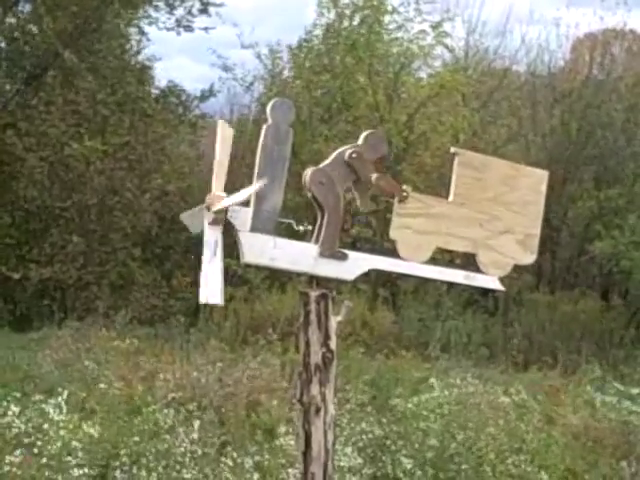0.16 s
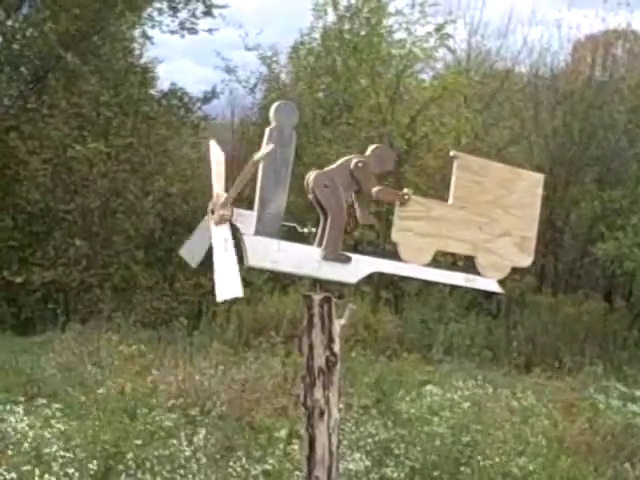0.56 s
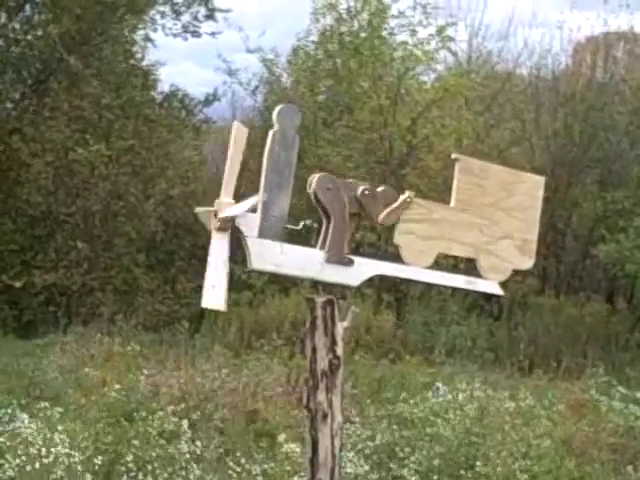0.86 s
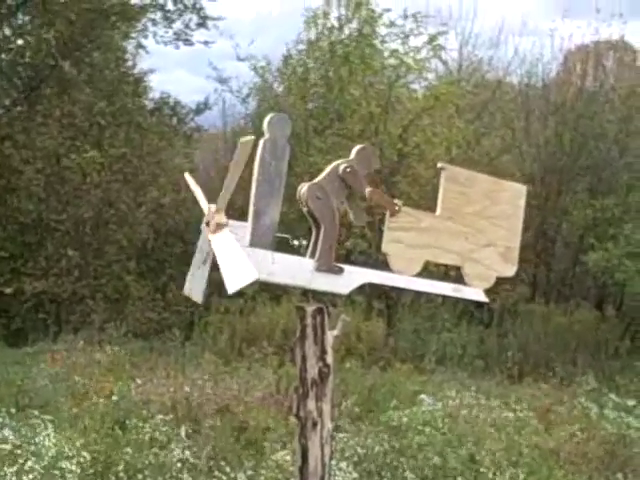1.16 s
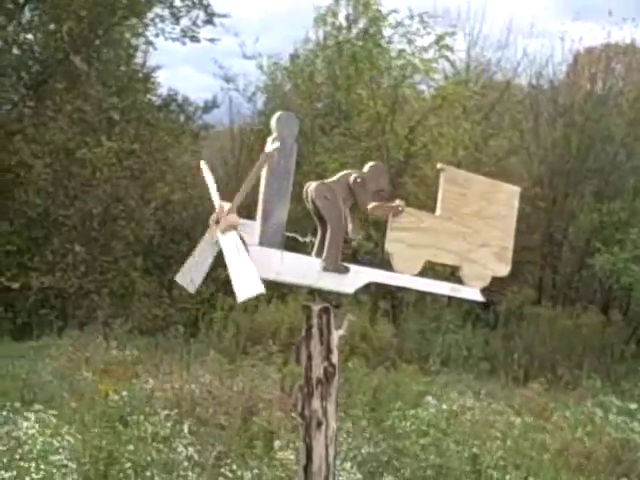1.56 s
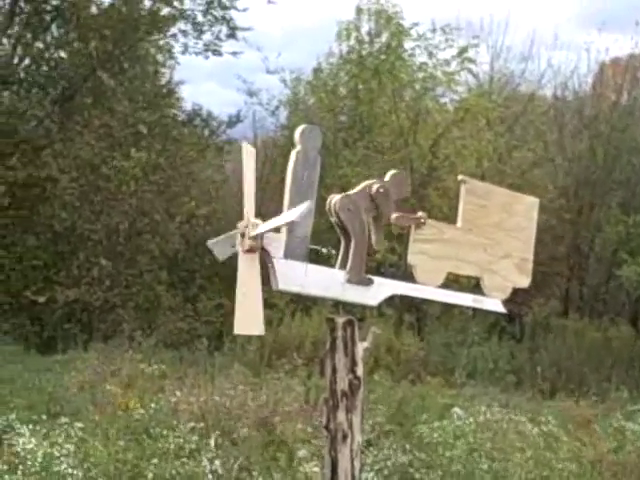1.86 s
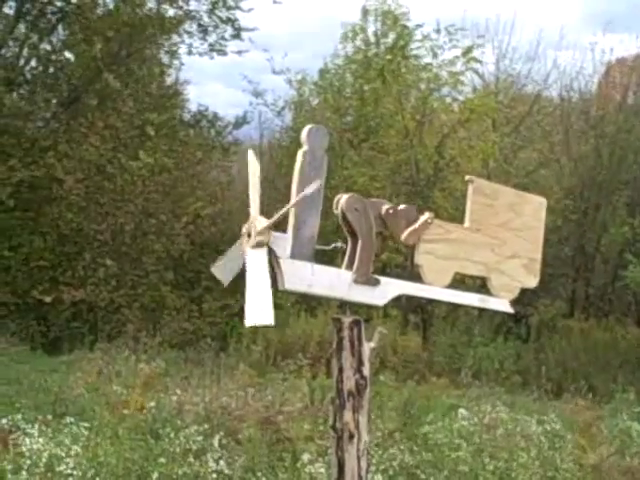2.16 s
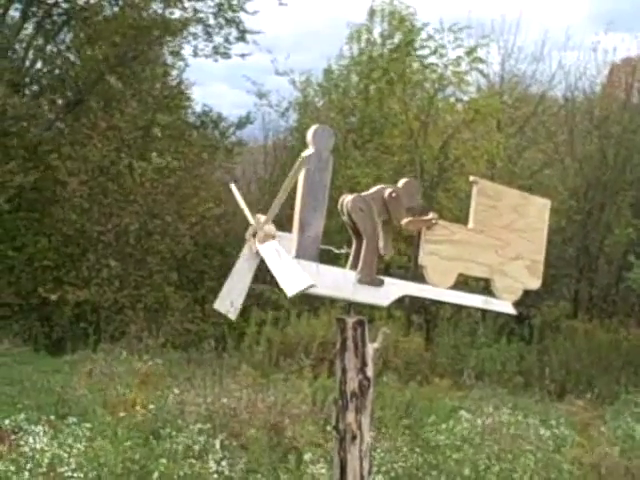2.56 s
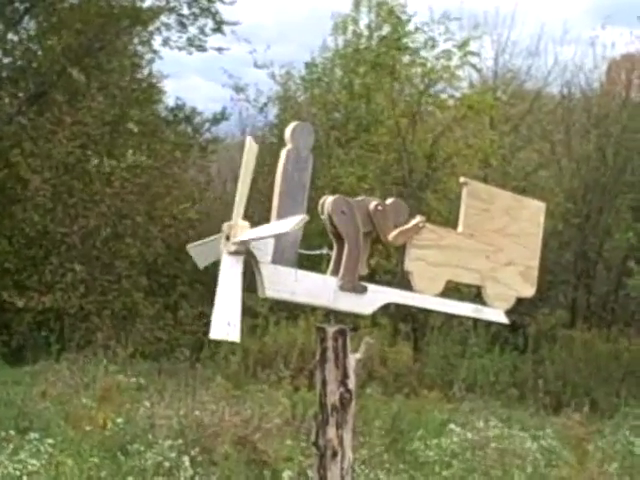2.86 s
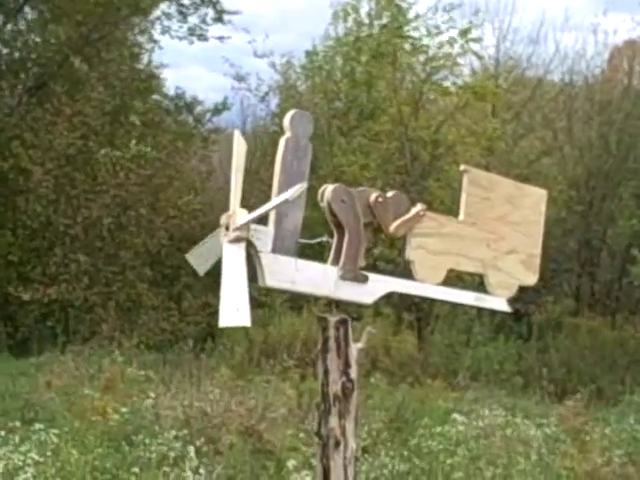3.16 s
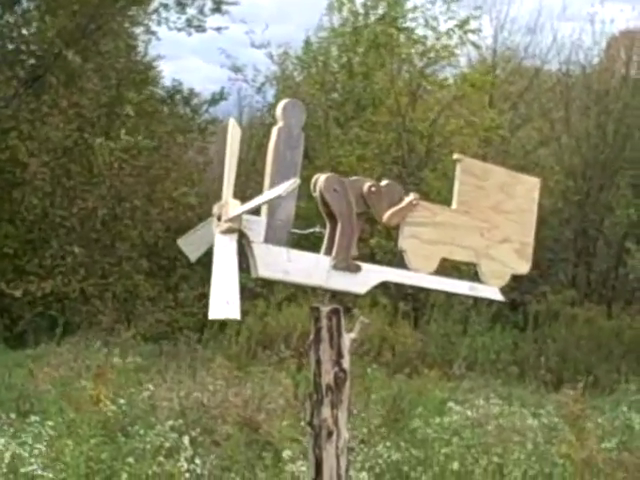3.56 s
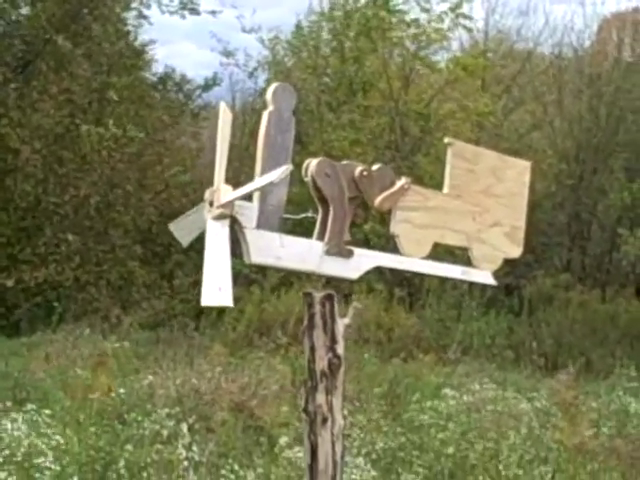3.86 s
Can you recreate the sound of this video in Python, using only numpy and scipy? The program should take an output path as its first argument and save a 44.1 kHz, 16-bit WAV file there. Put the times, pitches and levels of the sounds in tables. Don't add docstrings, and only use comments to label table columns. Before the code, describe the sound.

Wind buffets a small camera microphone in an open field: deep, rough thumps and sharp pops, strongest until 0.5 s, easing through 1.5 s into low uneven rumble. A wooden whirligig clacks dryly near 0.13, 0.54, 0.94 and 1.4 s, with lighter rattles between and tiny faint squeaks at 0.9 and 1.4 s. Weak knocks follow around 2.1 and 3.0 s. Faint leaf hiss continues; small gusts return near 2.6, 3.3 and 3.9 s.

```python
import sys
import numpy as np
from scipy import signal
from scipy.io import wavfile
from scipy.ndimage import uniform_filter1d

SR = 44100
rng = np.random.default_rng(int(sys.argv[2]) if len(sys.argv) > 2 else 0)


def undo_db(level):
    steps = np.asarray(level, float) / 20
    return 10 ** steps


def unload_audio(sound):
    columns = np.transpose(np.atleast_2d(sound))
    steps = np.round(np.clip(columns, -1, 1) * 32767)
    wavfile.write(sys.argv[1], SR, steps.astype(np.int16))


N = 176400
USUAL_DB = -30.5


def rms_one(x):
    return x / np.sqrt(np.mean(x ** 2) + 1e-20)


def in_time(rows):
    return np.interp(np.arange(N) / SR, *np.transpose(rows))


def at_hz(points, hz):
    points = np.array(points)
    return np.interp(np.log(hz), np.log(points[:, 0]), points[:, 1])


def band(x, low, high, order=2):
    return signal.sosfilt(signal.butter(order, [low, high], "band", fs=SR, output="sos"), x)


def low_pass(x, hz, order):
    return signal.sosfilt(signal.butter(order, hz, fs=SR, output="sos"), x)


def bell(middle_s, length_s, power=2):
    t = np.arange(N) / SR
    return np.exp(-(2 * (t - middle_s) / length_s) ** power)


def drift(rate):
    r = np.exp(-80 * np.pi * rate / SR)
    slow = signal.lfilter([1], [1, -2 * r, r * r], rng.standard_normal(N // 40 + 2002))[2000:]
    return np.interp(np.arange(N) / 40, np.arange(len(slow)), rms_one(slow))


def smear(x, length_s):
    size = max(int(length_s * SR / 2), 2)
    power = uniform_filter1d(uniform_filter1d(x ** 2, size=size), size=size)
    return np.sqrt(np.abs(power))


def ring(clicks, hz, t60):
    r, w = undo_db(-60 / (t60 * SR)), 2 * np.pi * hz / SR
    return signal.lfilter([0, np.sin(w)], [1, -2 * r * np.cos(w), r * r], clicks + 1e-18)


def wind_strength():
    # start_s, level_db
    gust = [(0.0, -14), (0.11, -20.5), (0.24, -19.5), (0.4, -24.5), (0.7, -33), (1.22, -30), (1.39, -28),
            (1.54, -33.5), (1.89, -35.5), (2.04, -37.5), (2.25, -36.5), (2.66, -37), (3.12, -34),
            (3.31, -26), (3.39, -32.5), (3.69, -35.5), (3.85, -35.5), (4.0, -37.5)]
    # start_s, peak_db, length_s, sharpness_db_per_octave
    buffets = [(0.06, -3, 0.031, 4), (0.093, -6.5, 0.019, 6.5), (0.127, -1.5, 0.042, 1),
               (0.18, -3.5, 0.03, -1.5), (0.241, -6, 0.01, 0.5), (0.267, -7, 0.037, 4.5),
               (0.297, -11.5, 0.027, 0.5), (0.352, -6, 0.027, -2.5), (0.447, -8.5, 0.026, -5.5),
               (0.604, -8, 0.029, -1.5), (0.641, -15.5, 0.1, -0.5), (0.69, -16.5, 0.039, -0.5),
               (0.719, -13.5, 0.037, 3.5), (0.774, -16, 0.04, -1), (0.967, -16, 0.054, -1.5),
               (1.037, -11, 0.082, -3), (1.121, -14, 0.036, 2.5), (0.577, -13, .02, -1.5),
               (1.334, -15.5, 0.012, -8), (1.4, -20.5, 0.059, 0), (1.463, -16, 0.051, -3.5),
               (1.756, -19.5, 0.041, -1), (2.566, -17.5, 0.019, -0.5), (2.686, -18, 0.04, -2),
               (2.876, -16.5, 0.011, -9.5), (3.13, -21, 0.041, -1), (3.219, -17.5, 0.023, -4.5),
               (3.31, -23.5, 0.031, -1), (3.368, -24, 0.033, 3), (3.492, -25, 0.05, -3),
               (3.62, -23.5, 0.023, 0.5), (1.257, -16, 0.02, -2.5), (1.884, -28.5, 0.034, 3.5),
               (0.858, -20.5, 0.034, -1), (3.922, -14, 0.066, 0)]
    power, sharp_db = undo_db(2 * in_time(gust)), 0
    for start_s, peak_db, length_s, buffet_sharp_db in buffets:
        swell = bell(start_s + length_s / 4, max(length_s, 0.008))
        power = power + undo_db(2 * (peak_db - 10.5)) * swell
        sharp_db = sharp_db + buffet_sharp_db * swell
    push_db = 10 * np.log10(power) - USUAL_DB
    return push_db, sharp_db + 1.5 * undo_db(push_db - 13)


def wind(push_db, sharp_db):
    # pitch_hz, level_db_per_hz
    eddies = [(25, 4.5), (50, 3), (100, -1), (230, -17.5), (450, -31), (800, -40.5), (1600, -56.5),
              (3200, -68.5)]
    # pitch_hz, follow_db_per_db
    follows = [(25, 0.75), (130, 1.0639), (280, 1.5), (800, 1.5), (2500, -1.25)]
    eddies_per_cycle, eddy_spread_db, lump_db = 1.5, 2, 1.5
    out, lumps = 0, drift(14)
    edges = 22 * 2 ** np.arange(0, 7.6, 0.5)
    for low, high in zip(edges, edges[1:]):
        hz = np.sqrt(low * high)
        pulses = (rng.random(N) < eddies_per_cycle * hz / SR) * rng.choice([-1, 1], N)
        pulses = pulses * undo_db(eddy_spread_db * np.minimum(rng.exponential(1, N), 4))
        gain_db = at_hz(eddies, hz) + at_hz(follows, hz) * (push_db + lump_db * lumps)
        gain_db = gain_db + sharp_db * np.clip(np.log2(hz / 150), -1, 2.5)
        out = out + np.sqrt(hz / 100) * undo_db(gain_db) * rms_one(band(pulses + 1e-18, low, high))
    return undo_db(-35) * out


def pops():
    # middle_s, signed_height, width_s
    lone_eddies = [(.051, -0.83, 0.00056), (0.095, -0.72, 0.00065), (0.1141, -0.41, .0008),
                   (0.1251, -.4, 0.0012), (0.1889, -.4, 0.00077), (0.2391, -0.57, 0.0011),
                   (.2695, 0.27, 0.00051), (0.295, 0.3, 0.00064), (0.3389, -0.14, 0.0013),
                   (0.4538, 0.18, .001), (0.4641, 0.26, 0.0015), (.5863, -0.35, 0.0018),
                   (0.728, 0.061, 0.0013), (.794, -0.1, 0.002), (0.9739, .15, 0.0029),
                   (1.0576, 0.23, 0.0018), (1.084, -0.049, 0.0021), (1.2673, -0.15, 0.0017),
                   (2.5813, -0.075, .0015), (2.6939, 0.069, 0.0017), (2.8935, -0.025, 0.0015),
                   (3.944, .1, 0.0015), (3.928, -0.14, 0.0017)]
    t, out = np.arange(N) / SR, 0
    for middle_s, height, width_s in lone_eddies:
        u2 = ((t - middle_s) / width_s) ** 2
        out = out + height * (1 - u2) * np.exp(-u2 / 2)
    return out


def flutters():
    # middle_s, level_db, length_s
    light_puffs = [(0.023, -42.5, 0.036), (0.065, -30.5, 0.055), (.097, -30, .012), (0.207, -38.5, 0.021),
                   (0.267, -32.5, 0.012), (0.289, -45.5, .03), (0.35, -48.5, 0.013), (0.42, -53, 0.016),
                   (0.621, -47.5, 0.049), (0.726, -46, 0.015), (1.131, -48.5, 0.028), (1.225, -54, 0.024),
                   (1.401, -44, 0.02), (1.427, -50, 0.055), (1.74, -49, 0.043), (2.571, -50.5, 0.049),
                   (2.895, -47.5, 0.046), (3.016, -45.5, 0.015), (3.157, -56.5, 0.053),
                   (3.313, -49.5, 0.03), (3.375, -50, 0.029), (3.504, -49, 0.046), (3.655, -50, 0.034),
                   (3.796, -51.5, 0.18), (3.963, -50, 0.072)]
    eddies_per_s = 900
    pulses = (rng.random(N) < eddies_per_s / SR) * rng.standard_normal(N)
    swells = sum(undo_db(db) * bell(middle_s, length_s) for middle_s, db, length_s in light_puffs)
    return swells * rms_one(band(pulses, 359, 1486))


def touches():
    # start_s, peak_db, hardness_db, change_per_touch_db
    crank_knocks = [(0.011, -47.5, 25, 3.5), (0.033, -41.5, 26, 2.5), (.052, -40.5, 32.5, 1),
                    (.09, -45, 25, 1.5), (.121, -36, -0.5, 1), (.130, -23, -2.5, -2.5),
                    (.1405, -34.5, -6, -4), (.187, -39.5, 6.5, 1.5), (0.3836, -41, -8, -4),
                    (0.429, -45, 40, 2.5), (0.4596, -43.5, 29.5, 2), (0.537, -40, 8, 0.5),
                    (0.5414, -23.5, -4, -7), (.578, -45, 18, -0.5), (0.5938, -33, 4, -2.5),
                    (0.8578, -43.5, 7.5, 1.5), (0.8726, -38, -10.5, -2), (0.894, -35.5, 11, 1.5),
                    (0.917, -36.5, 21, 1.5), (0.9434, -26, -4, -2), (0.9538, -37.5, -1, -4),
                    (1.009, -46.5, -10, -3.5), (1.335, -41.5, 16.5, -3.5), (1.4014, -32.5, 5.5, -4),
                    (1.412, -39.5, -6.5, -1.5), (1.445, -43.5, 10, -3), (1.471, -39.5, 24, 0),
                    (1.49, -40.5, 7, -3), (2.0456, -40, 1.5, -2.5), (2.112, -35.5, 14, -3.5),
                    (3.017, -40, -7, -9)]
    touch_s, jitter = 0.0045, 0.3
    start_s, db, hard_db, change_db = np.transpose(crank_knocks)[:, :, None]
    j = np.arange(4)
    uneven = jitter * (j > 0) * rng.uniform(-1, 1, (len(start_s), len(j)))
    start_s = start_s + touch_s * (j + uneven)
    return (start_s * SR).astype(int).ravel(), (db + change_db * j).ravel(), (hard_db + 0 * j).ravel()


def whirligig(at, db, hard_db):
    # pitch_hz, level_db, t60_s
    wood_modes = [(1056, -8.5, 0.075), (1210, -12, 0.093), (1760, -3.5, 0.063), (1980, -5.5, 0.074),
                  (2182, -6.5, 0.044), (2580, -4.5, .04), (2760, -7, 0.035), (2870, -2.5, 0.041),
                  (3171, 0, 0.04), (3500, -6.5, 0.025)]
    mode_spread_db, knock_db = 3.5, -12
    chance = rng.standard_normal((len(at), len(wood_modes)))
    out = np.zeros(N)
    for k, (hz, level_db, t60) in enumerate(wood_modes):
        tilt_db = hard_db * np.log2(min(hz, 3200) / 3000)
        strike_db = db + knock_db + level_db + tilt_db + mode_spread_db * chance[:, k]
        clicks = np.bincount(at, undo_db(strike_db), N) * (-1) ** k
        out += ring(clicks, hz, t60)
    return out


def crack(at, db, hard_db):
    decay = [1, -np.exp(-1 / (0.0035 * SR))]
    strike = undo_db(db - 13.5)
    soft = undo_db(-np.maximum(hard_db, 0))
    wide = signal.lfilter([1], decay, np.bincount(at, strike * soft, N) + 1e-18)
    narrow = signal.lfilter([1], decay, np.bincount(at, strike, N) + 1e-18)
    wide_noise = rms_one(band(rng.standard_normal(N), 950, 4000))
    narrow_noise = rms_one(band(rng.standard_normal(N), 2650, 3450))
    return 0.4 * wide * wide_noise + 0.8 * narrow * narrow_noise


def squeaks():
    # middle_s, level_db
    rod_squeaks = [
        (0.91, -49),
        (1.423, -54),
    ]
    swells = sum(undo_db(db) * bell(middle_s, 0.017, power=4) for middle_s, db in rod_squeaks)
    return swells * np.sin(2 * np.pi * 5330 * np.arange(N) / SR)


def leaves():
    # pitch_hz, level_db_per_hz
    leaf_colour = [(280, -4.5), (600, 2), (1100, -3), (2000, -5), (3200, -6.0), (4300, -7.5)]
    out, edges = 0, 250 * 2 ** np.arange(0, 4.4, 1 / 3)
    for low, high in zip(edges, edges[1:]):
        gain_db = at_hz(leaf_colour, np.sqrt(low * high)) + 1.2 * drift(4.6)
        out = out + undo_db(gain_db) * band(rng.standard_normal(N), low, high)
    return undo_db(-50.5) * rms_one(out)


def treble_tips():
    # middle_s, swings, length_s
    tip_moments = [(0, 2.7, 0.036), (0.055, 4, .05), (0.199, 3, .03), (0.298, 2.5, .12), (0.702, 1.4, 0.17),
                   (0.872, 1.9, .03), (0.948, 4.5, 0.041), (1.118, 2, .08), (1.233, 1.1, 0.028),
                   (1.392, 1, 0.046), (1.738, 1.5, 0.032), (1.78, -2.7, .03), (2.577, 1.5, 0.045),
                   (2.889, 0.95, .06), (3.022, 1.24, .04), (3.313, 1.1, .035), (3.377, 0.7, .03),
                   (3.493, 1.24, 0.039), (3.666, 1.7, 0.044), (3.804, 1.24, 0.11), (3.954, 1.6, 0.078)]
    return sum(swings * bell(middle_s, length_s) for middle_s, swings, length_s in tip_moments)


def treble(hiss, knocks, tips):
    # low_hz, high_hz, hiss_db, knock_db, swing_db
    treble_bands = [(3880, 5260, -3.5, -13.5, -0.5), (5240, 5650, -7, -21.5, -2),
                    (5570, 6400, -9.5, -17.5, 1), (6370, 7250, -9, -11, 6), (7300, 8700, -31.5, -33.5, 7.5),
                    (8660, 9150, -26, -29.5, 6.5), (9150, 9600, -32.5, -33, 7)]
    out = 0
    for low, high, hiss_db, knock_db, swing_db in treble_bands:
        level = np.hypot(undo_db(hiss_db + swing_db * tips) * hiss, undo_db(knock_db) * knocks)
        noise = rms_one(band(rng.standard_normal(N), low, high, order=8))
        out = out + level * undo_db(1.3 * drift(60)) * noise
    return out


def scene():
    # start_s, level_db
    hiss_levels = [(0, -63), (.09, -69), (.22, -63.5), (.285, -78), (.33, -71), (.38, -72.5), (.43, -62.5),
                   (.60, -56.5), (.645, -71.5), (.70, -70.5), (.85, -61), (1.12, -64), (1.2, -62), (1.73, -62),
                   (1.78, -58), (1.83, -62.5), (3.3, -64), (4, -64.5)]
    air = wind(*wind_strength()) + pops() + flutters()
    air = low_pass(air, 2100, 4)
    hits = touches()
    wood = whirligig(*hits) + crack(*hits)
    hiss_level_db = in_time(hiss_levels)
    hiss = undo_db(0.18 * (hiss_level_db - hiss_level_db.max())) * leaves()
    low_cut = signal.ellip(8, 0.5, 50, 3920, fs=SR, output="sos")
    low = signal.sosfilt(low_cut, air + wood + hiss)
    knocks = undo_db(USUAL_DB) * (smear(wood, 0.036) / undo_db(USUAL_DB)) ** 1.34
    return (low + treble(undo_db(hiss_level_db), knocks, treble_tips()) + squeaks())[None]


def coarse(x):
    frame, low_hz, high_hz, edge_hz = 1024, 500, 3950, 3750
    n = np.arange(2 * frame)
    k = np.arange(int(2 * frame * low_hz / SR), int(2 * frame * high_hz / SR))
    window = np.sin(np.pi * (n + 0.5) / (2 * frame))[:, None]
    cosines = np.cos(np.pi / frame * np.outer(n + 0.5 + frame / 2, k + 0.5))
    basis = window * cosines * np.sqrt(2 / frame)
    index = np.arange(N // frame + 2)[:, None] * frame + n
    padded = np.pad(x, (frame, 3 * frame))
    lines = padded[index] @ basis
    power = np.mean(padded[index] ** 2, axis=1, keepdims=True)
    loud = np.sqrt(np.abs(uniform_filter1d(power, size=11, axis=0))) + 1e-9
    local = np.abs(uniform_filter1d(lines ** 2, size=12, axis=1))
    loud_step = undo_db(-42.7) * (loud / undo_db(USUAL_DB)) ** 0.64
    step = np.sqrt(loud_step ** 2 + undo_db(2 * -4) * local)
    scatter = np.repeat(rng.standard_normal((len(index), len(k) // 3 + 1)), 3, axis=1)[:, :len(k)]
    edge_db = 2.5 * (k > 2 * frame * edge_hz / SR)
    step = step * undo_db(3.2 * scatter + 2.2 * np.log2(k / k[-1]) + edge_db)
    rounded = np.sign(lines) * np.floor(np.abs(lines) / step + 0.38) * step
    change = np.bincount(index.ravel(), ((rounded - lines) @ basis.T).ravel(), len(padded))
    return x + 0.92 * change[frame:frame + N]


def top_cut(x):
    return signal.sosfilt(signal.butter(12, 9550, fs=SR, output="sos"), x)


def record(dry):
    x = signal.sosfilt(signal.butter(2, 20, "high", fs=SR, output="sos"), dry[0])
    x = 0.9 * np.tanh(x / 0.9)
    x = low_pass(coarse(x), 9800, 8)
    return top_cut(x[None])


dry = scene()
out = record(dry)
unload_audio(out)
```